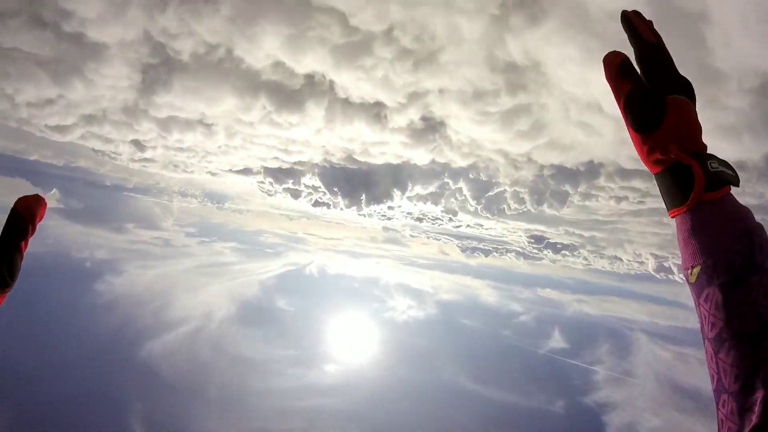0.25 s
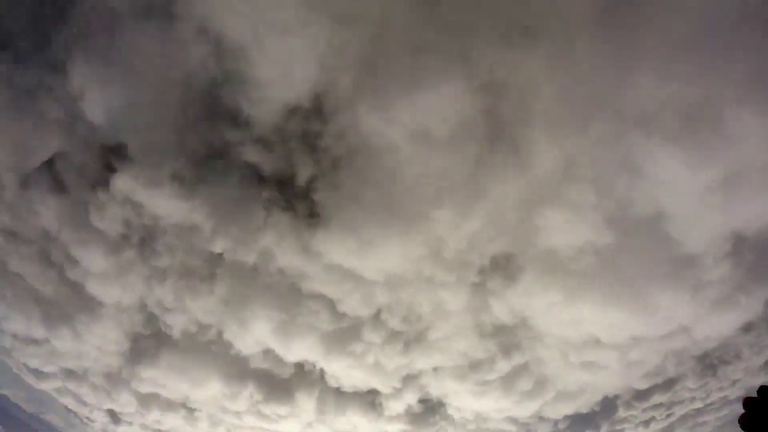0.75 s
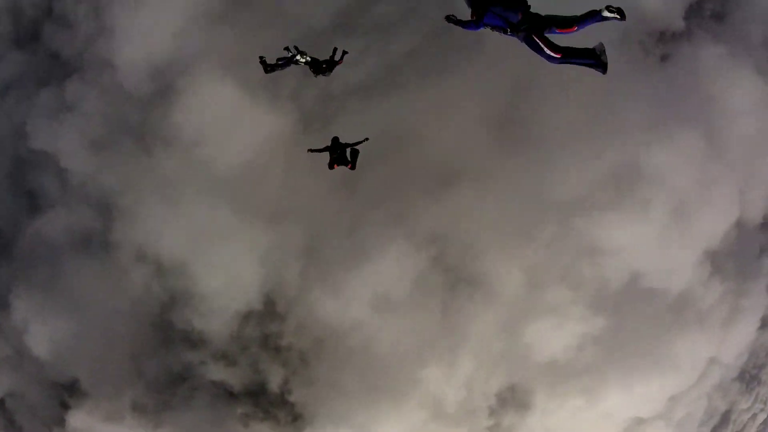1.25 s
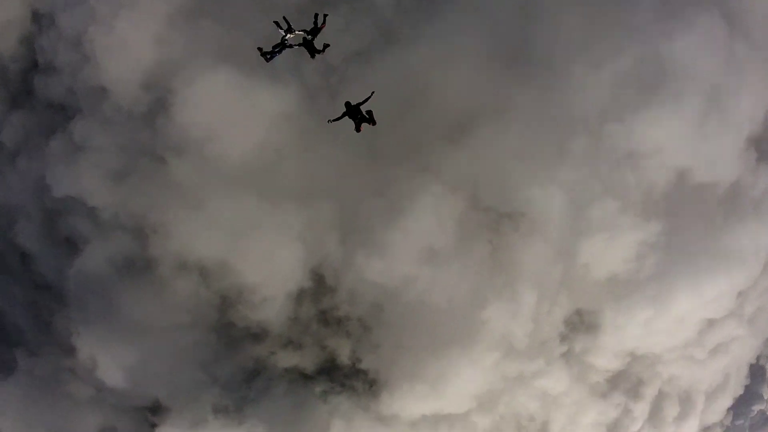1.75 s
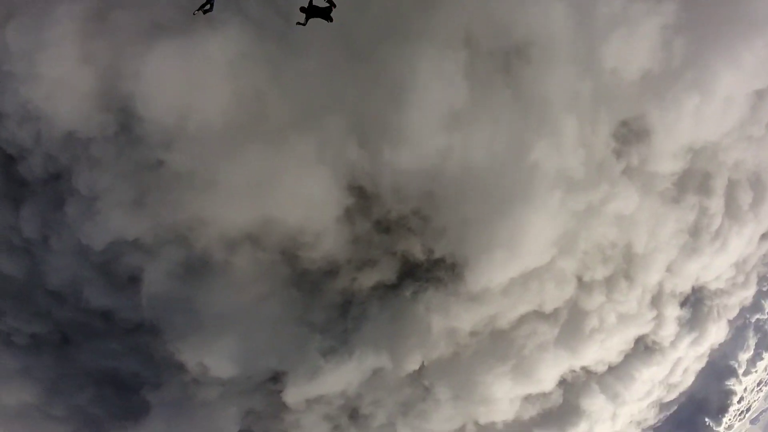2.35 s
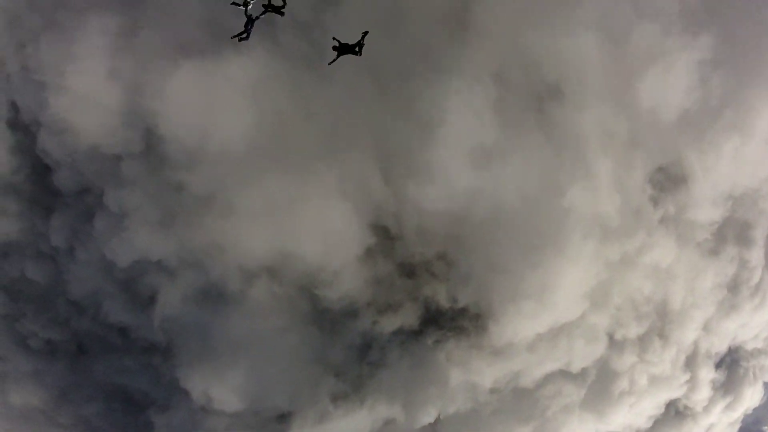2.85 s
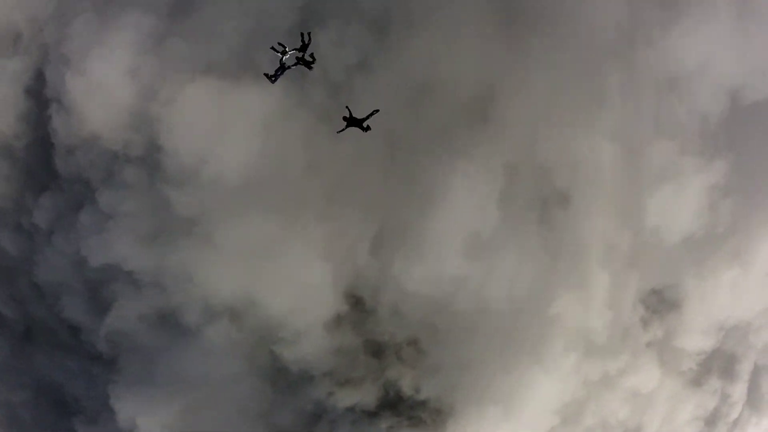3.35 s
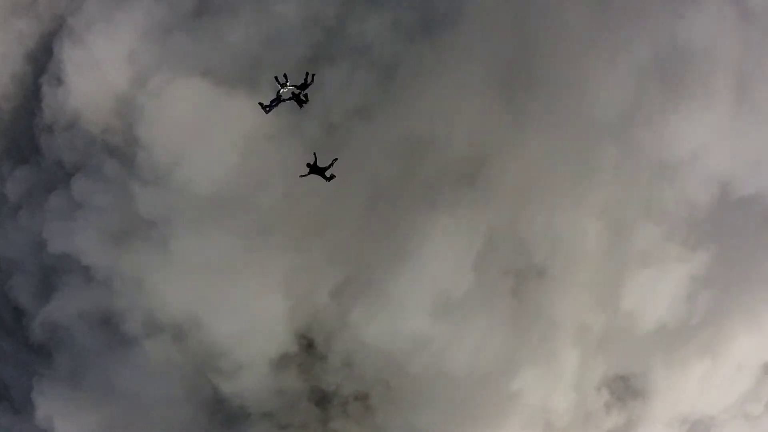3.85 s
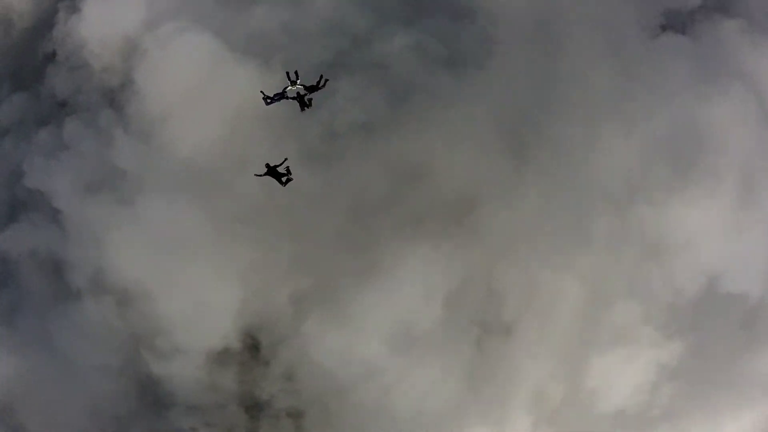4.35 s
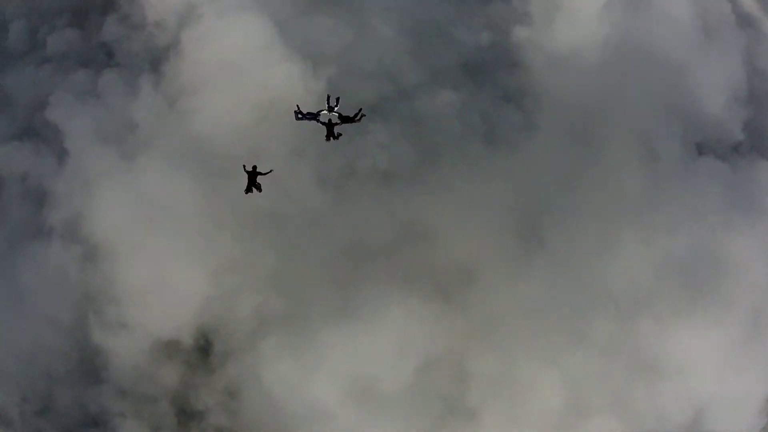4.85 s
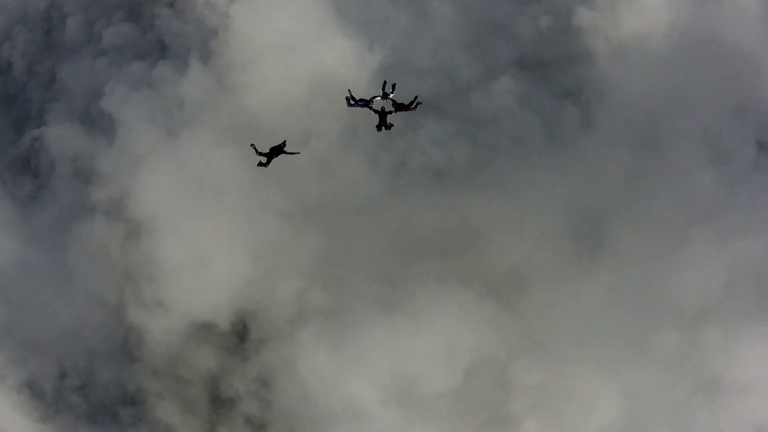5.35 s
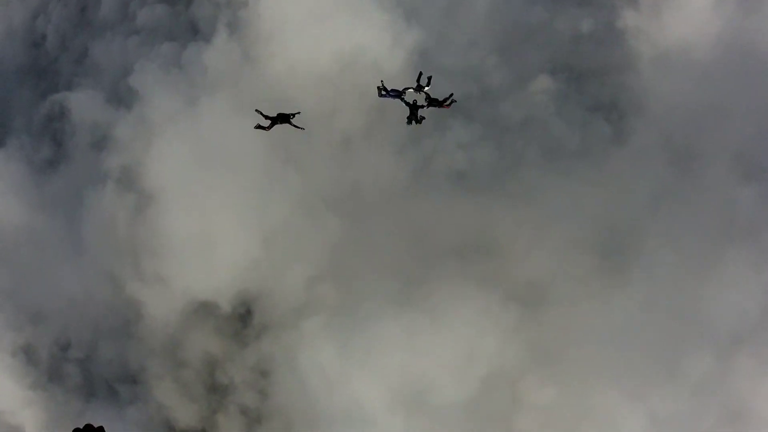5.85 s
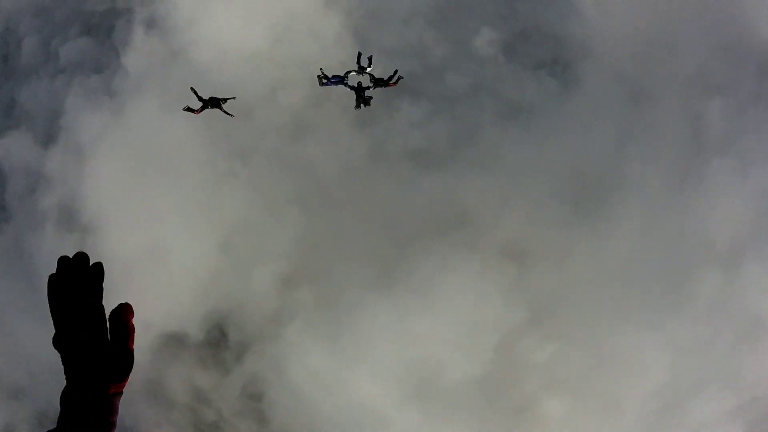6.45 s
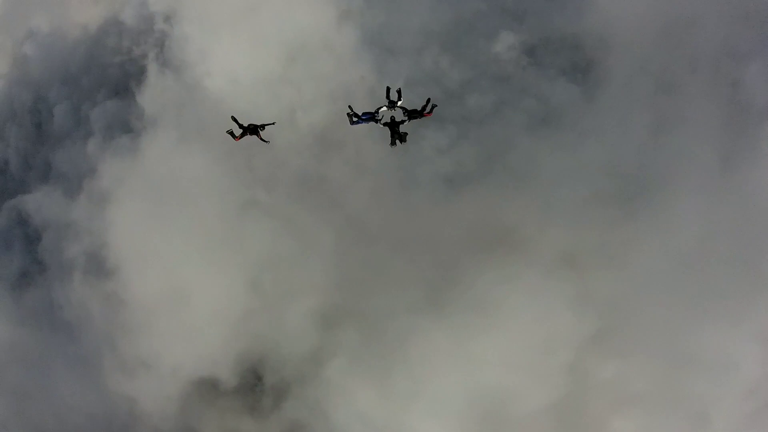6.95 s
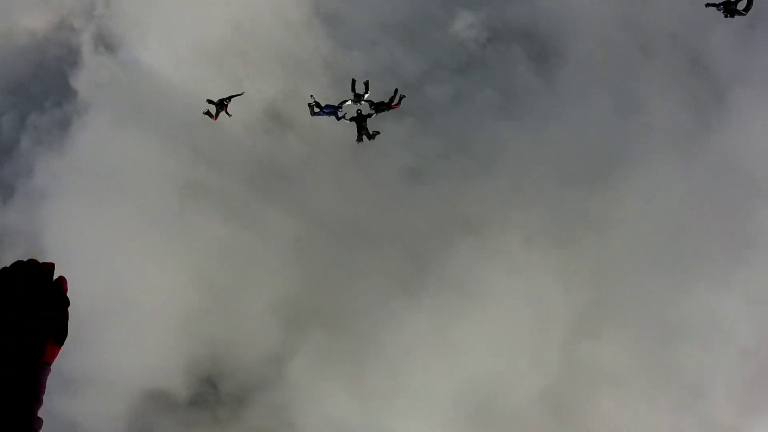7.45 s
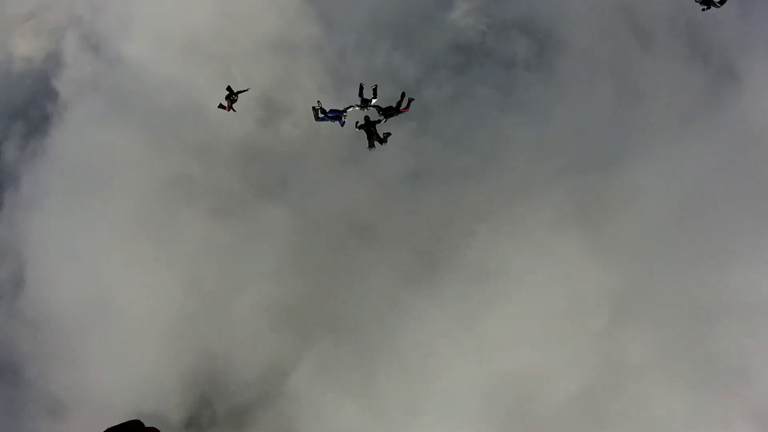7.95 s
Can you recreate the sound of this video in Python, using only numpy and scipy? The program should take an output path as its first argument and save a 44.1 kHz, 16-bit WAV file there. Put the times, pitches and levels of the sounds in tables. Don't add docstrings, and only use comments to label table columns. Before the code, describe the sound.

Rushing air buffets a skydiver's camera housing, deep rumble under hollow hiss, fluttering gusts and scattered sharp clacks of a buckle.

```python
import sys
import numpy as np
from scipy import signal
from scipy.fft import rfft, irfft, next_fast_len
from scipy.io import wavfile
from scipy.ndimage import uniform_filter1d

SR = 44100
rng = np.random.default_rng(int(sys.argv[2]) if len(sys.argv) > 2 else 0)


def to_wav(sig):
    pcm = np.clip(np.atleast_2d(sig), -1, 1) * 32767
    pcm = np.round(pcm).astype(np.int16)
    wavfile.write(sys.argv[1], SR, pcm.T)


def voltage_ratio(decibels):
    exponent = np.asarray(decibels, float) / 20
    return 10 ** exponent


N = 361619
HZ = np.fft.rfftfreq(next_fast_len(N), 1 / SR)
TIME = np.arange(N) / SR

# t/s, rumble level/dB, small eddies re rumble/dB
BUFFET = [(0, -28, -9.5), (0.4, -28, -4.6), (0.7, -23, -9.5), (1.0, -26, -3), (1.15, -18, -5.0),
          (1.6, -15, -14), (1.8, -18.5, -9.5), (2.0, -25.5, -3), (2.22, -19, -21), (2.45, -31.5, -3.5),
          (3.25, -25, -4.5), (3.7, -18.7, -7), (4.2, -18, 0.5), (4.8, -17, -6.0), (5.5, -21.5, -5),
          (6.55, -23.5, -1), (6.9, -20.5, -6.5), (8.2, -18.5, -9)]
# t/s, change/dB, half length/s
SURGES = [(0.222, -5, 0.02), (0.653, -4, 0.018), (0.812, 7, 0.013), (1.424, -7, 0.023), (1.569, 8, 0.009),
          (1.701, -7, 0.014), (1.769, 3, 0.02), (2.091, -2, 0.02), (2.971, 6.5, 0.03), (3.138, 4.9, 0.02),
          (3.229, -5.5, 0.03), (4.113, 3.2, 0.02), (4.413, -9, 0.02), (4.512, -12, 0.014),
          (4.73, 3.5, 0.049), (5.07, -3, 0.02), (5.211, 5.5, 0.018), (5.342, -2, 0.02), (5.42, 3, 0.022),
          (5.519, -2, 0.02), (5.814, 4, 0.033), (5.927, -7, 0.025), (6.073, 3, 0.027), (6.422, 5, 0.018),
          (6.535, -2, 0.045), (6.771, 4, 0.033), (6.952, 1, 0.018), (7.052, -4, 0.032), (8.077, 4.5, 0.016),
          (8.145, -6, 0.022)]
# f/Hz, level/dB
RUMBLE_COLOUR = [(12, -38), (20, -6.5), (108, 2.5), (132, 1.5), (180, -10), (230, -41), (400, -120)]
# f/Hz, level/dB
EDDY_COLOUR = [(110, -39), (180, -4), (242, -1), (274, -4), (399, -5), (553, -12.5), (947, -13.5),
               (1050, -22.5), (1360, -19), (2310, -120)]
# f/Hz, width/Hz, level/dB
SHOULDER = [(162.5, 78, 0)]
# t/s, small eddies/dB, shell/dB, half length/s
GUSTS = [(0.212, 0.5, -3, .06), (0.69, 1, .5, 0.033), (0.863, -6.5, -2.5, 0.044), (1.113, 5, 3.5, 0.027),
         (1.29, -6.5, 0, 0.028), (1.438, -2.5, 3.5, 0.047), (1.72, 1, -2, 0.021), (2.018, 0, 7, 0.065),
         (2.208, 5.5, 5.5, 0.036), (2.86, 1.5, .3, .03), (3.714, 3, 0, 0.027), (4.01, 1, 1.5, 0.055),
         (4.347, -3.5, 0, 0.033), (4.605, 1.5, 1.5, .03), (4.78, 1.5, 2.5, 0.033), (5.102, -2, -2.8, 0.071),
         (6.35, 0.5, 1.5, 0.064), (7.09, -2.5, -0.5, 0.076), (7.256, 5, 3, 0.037), (7.557, 0, -5.5, 0.02)]

# t/s, rush level/dB, shell flow re rush/dB, grazing flow re rush/dB
FLOW = [(0, -30.5, -3.8, -13), (0.22, -18.5, -2.5, -15), (0.6, -14.5, -7, -17.5), (0.93, -28, 3.5, -13.5),
        (1.2, -16.5, -6, -17.0), (1.36, -22.5, -9, -18), (1.75, -21.2, -7.5, -20.5), (2.15, -29, -6, -13),
        (3.13, -16, -9.5, -12.5), (3.3, -23, -6.5, -13.5), (3.75, -24, -1, -11.5), (4.1, -23, 5, -13.5),
        (4.7, -24.5, 0.1, -13.0), (5.45, -20, -1.1, -14), (6.1, -20.5, -2.6, -14.9), (6.6, -22, 2, -12),
        (6.95, -19, -5, -14.6), (8.2, -20, -6, -17)]
# t/s, flutter/dB
UNREST = [(0, 0.9), (1.2, 1), (1.32, 4.5), (1.8, 4), (1.95, 2), (2.3, 0.8), (3.2, 0.8), (4.5, 1.6),
          (6.8, 1.6), (7.1, 2.2), (7.8, 2.5), (8.2, 3.5)]
# t/s, peak level/dB
PUFFS = [(1.1792, -15), (1.3134, -24), (1.3688, -16), (1.4182, -22), (1.4641, -27), (1.485, -19),
         (1.5354, -25), (1.5788, -23), (1.6072, -19), (1.6432, -29), (1.6636, -19), (1.701, -18),
         (1.737, -17), (1.7854, -19), (4.5072, -23), (5.444, -16), (6.999, -30), (7.0758, -22),
         (7.1157, -23), (7.3063, -20), (7.3991, -28), (7.4654, -13), (7.5158, -20), (7.7288, -14),
         (7.7957, -12), (7.9274, -19), (8.0087, -18), (8.085, -15), (8.1748, -17)]
# t/s, change/dB, half length/s
LULLS = [(.79, 0.5, 0.087), (1.02, -1.5, .05), (1.345, -3, 0.018), (1.406, -1.5, 0.0092),
         (1.43, -7.5, 0.027), (1.555, -3.5, 0.009), (1.69, -5, 0.0075), (1.723, -4.5, .01),
         (1.986, -3, 0.047), (2.109, -2.5, 0.042), (2.22, -2, 0.072), (3.2, -1.5, 0.027), (4.44, -1, 0.022),
         (4.79, 1, 0.057), (4.94, -0.5, .025), (5.633, -1.5, 0.022), (6.231, -2.5, .01),
         (6.358, -2.5, 0.012), (6.58, -2, .01), (6.93, -2.5, .016), (7.048, -2, 0.009),
         (7.098, -3.5, 0.0095), (7.379, -1, 0.011), (7.451, -3, 0.012), (7.492, -3, 0.012),
         (7.7, -0.1, 0.066), (7.896, -3, 0.012), (7.991, -4.5, 0.014), (8.063, -3, 0.0067),
         (8.141, -4, 0.045)]
# t/s, posture (-1 head-down, 1 flat)
POSTURE = [
    (0, .6),
    (.9, -0.57),
    (1.8, -0.26),
    (2.3, -1),
    (4.2, -1.15),
    (4.8, -0.37),
    (5.15, 0.73),
    (6.6, 0.71),
    (8.2, 0.66),
]

# f/Hz, width/Hz, level/dB
SHELL = [(1445, 293, 0), (1310, 280, -5)]
# f/Hz, width/Hz, level/dB
SKIRT = [(1787, 470, 0), (2750, 560, -2)]
# f/Hz, width/Hz, level/dB
PORT = [(2168, 226, 1), (2390, 260, 2.5)]
# f/Hz, width/Hz, level/dB
GAP = [(2580, 460, 0)]
# f/Hz, width/Hz, level/dB
CAVITY = [(2915, 540, 1), (3490, 760, -2), (3993, 370, -1.5)]
# f/Hz, width/Hz, level/dB
HIGH_CAVITY = [(5960, 820, 1), (6580, 910, -5.5), (4900, 810, -14)]
# f/Hz, width/Hz, level/dB
AIR = [(8200, 760, 1), (7580, 880, -2), (9260, 1300, -7)]
# f/Hz, width/Hz, level/dB
TOP = [(10750, 2000, 0), (12340, 2000, -7.5), (14500, 1500, -11.5)]

# t/s, f/Hz, level/dB
WHISTLE = [
    (.2, 9700, -70),
    (.21, 9800, -49),
    (.235, 10450, -47),
    (.25, 10500, -70),
]
# t/s, peak level/dB, f/Hz, upper modes/dB
KNOCKS = [(1.8098, 2, 1460, -8), (1.924, -7, 1460, -10), (3.1388, -5, 1450, -7), (3.161, 5, 1500, 1),
          (4.0013, -8, 1430, -9), (4.2478, -4, 1320, -7), (4.363, -7, 1370, 5), (4.42, -2, 1480, -15),
          (4.8223, -5, 1390, 2), (5.6306, 2.5, 1330, -18), (5.808, -2.5, 1390, -4),
          (5.8574, 1.5, 1430, -14), (5.9334, -5, 1430, -6), (6.206, -5, 1430, 8), (6.628, -2, 1380, 3),
          (6.6835, 1, 1460, -7), (7.4135, -4, 1500, -12), (7.705, -5, 1420, -7)]
# t/s, peak level/dB, f/Hz, upper modes/dB
TICKS = [
    (1.5354, -6, 2120, -14),
    (3.549, -9, 1600, -9),
    (3.5493, -8, 2160, -6),
    (3.694, -8, 1630, -9),
    (3.6935, -3.5, 2100, -8),
    (3.7678, -8, 2390, -4),
    (3.8182, -5, 2160, 7),
    (5.9344, -8, 2140, -10),
    (7.7274, -16, 2350, -8),
]
# t/s, gain/dB, recovery/s
DUCKS = [
    (1.815, -13, 0.032),
    (3.153, -3.5, 0.038),
]

# (dB of shell flow, dB of grazing flow, unit of posture)
FINE_EDDY_LAW, SKIRT_LAW, UPPER_LAW = (0.31, 0.36, 3.1), (0.041, 0.3, 0.27), (-0.15, 0.46, 0.1)
HISS_LAW, TOP_LAW, GAP_LAW = (0.13, 0.92, -0.72), (-0.1, 0.36, -1.3), (0.55, 0.95, -1.6)
DEEP_LAW = (.02, .02, 2.6)
PORT_LAW = (.02, -.1, 0.35)
SHOULDER_LAW = (.02, .02, -3)
USUAL_SHELL_DB, USUAL_GRAZE_DB = -3, -12
FINE_PER_RUSH, DEEP_PER_RUMBLE, SKIRT_PER_UNREST = 0.61, -0.18, -1.3


def level(x, db):
    return x * voltage_ratio(db) / np.sqrt(np.mean(x ** 2))


def play(table):
    s, *columns = np.transpose(table)
    return [np.interp(TIME, s, c) for c in columns]


def shape(points):
    hz, db = np.transpose(points)
    return voltage_ratio(np.interp(np.log(HZ + 1), np.log(hz), db))


def walk(rate):
    k = int(SR / rate)
    held = np.repeat(rng.standard_normal(N // 20)[:N // k + 1], k)[:N]
    slewed = uniform_filter1d(uniform_filter1d(held, k), k)
    return level(slewed - uniform_filter1d(slewed, size=5 * k), 0)


def noise_spectrum(gain):
    return gain * rfft(rng.standard_normal(next_fast_len(N)))


def rung(modes, own_db, rate):
    out = 0
    for hz, width, db in modes:
        resonance = 1 / (1 + (2 * (HZ - hz) / width) ** 2)
        flicker = voltage_ratio(db + own_db * walk(rate))
        out = out + flicker * irfft(noise_spectrum(resonance))[:N]
    return level(out, 0)


def steady(x, span_s, firmness):
    k = int(span_s * SR)
    power = uniform_filter1d(uniform_filter1d(x ** 2, k), k)
    return x * (np.mean(power) / (power + 1e-12)) ** (firmness / 2)


def split(gain, hz, low_db, high_db):
    share = 1 / (1 + (HZ / hz) ** 4)
    whole = noise_spectrum(gain)
    low = steady(irfft(whole * share)[:N], span_s=0.13, firmness=0.56)
    high = steady(irfft(whole * (1 - share))[:N], span_s=0.075, firmness=0.57)
    return (voltage_ratio(low_db) * low + voltage_ratio(high_db) * high) / np.std(low + high)


def strikes(rows, rise_s):
    out = np.zeros(N)
    for s, size, fade_s in rows:
        t = np.maximum(TIME - s, 0)
        out += size * (1 - np.exp(-t / rise_s)) * np.exp(-t / fade_s)
    return out


def swells(rows):
    out = np.zeros(N)
    for s, db, half_s in rows:
        near = slice(max(int((s - 0.3) * SR), 0), int((s + 0.3) * SR))
        half_s = np.clip(half_s, 0.004, 0.08)
        out[near] += db * np.exp(-0.5 * ((TIME[near] - s) / half_s) ** 2)
    return out


def by_angle(law):
    per_shell, per_graze, per_posture = law
    _, shell_db, graze_db = play(FLOW)
    turned_db = per_shell * (shell_db - USUAL_SHELL_DB) + per_graze * (graze_db - USUAL_GRAZE_DB)
    return turned_db + per_posture * play(POSTURE)[0]


def buffet():
    rumble_db, small_db = play(BUFFET)
    surge_db = swells(SURGES)
    gust_db = swells([(s, db, half_s) for s, db, _, half_s in GUSTS])

    deep_db = DEEP_PER_RUMBLE * (rumble_db + 24) + by_angle(DEEP_LAW) + 0.4
    swing = split(shape(RUMBLE_COLOUR), 62, deep_db, 0)
    rumble = swing * voltage_ratio(0.2 + surge_db + 0.65 * walk(7.9))

    fine_db = by_angle(FINE_EDDY_LAW) + FINE_PER_RUSH * (play(FLOW)[0] + 20) + 0.27
    small_db = small_db + gust_db - 0.28 + 0.28 * surge_db + 0.86 * walk(14)
    small = split(shape(EDDY_COLOUR), 540, 0, fine_db) * voltage_ratio(small_db)

    shed_db = by_angle(SHOULDER_LAW) - 11 + gust_db + 0.54 * surge_db
    shed = voltage_ratio(shed_db) * rung(SHOULDER, own_db=2.5, rate=12)
    return voltage_ratio(rumble_db) * (rumble + small + shed), swing


def whistle():
    hz, db = play(WHISTLE)
    sounding = (TIME > WHISTLE[0][0]) & (TIME < WHISTLE[-1][0])
    cycles = np.cumsum(hz * (1 + 0.0056 * walk(150))) / SR
    return sounding * voltage_ratio(db) * np.sin(2 * np.pi * cycles)


def knocks():
    out = np.zeros(N + 2000)
    t = np.arange(800) / SR
    blow = t ** 3.1 * np.exp(-t / (0.0016 * 0.53))
    blow = blow / blow.max()
    upper_modes = np.sin(2 * np.pi * 2400 * t) + np.sin(2 * np.pi * 3000 * t)
    for s, db, hz, upper_db in KNOCKS + TICKS:
        ring = np.sin(2 * np.pi * hz * t)
        upper = upper_modes * voltage_ratio(upper_db - 11.5)
        crack = voltage_ratio(db - 9.5) * np.exp(-t / 0.00052) * np.sin(2 * np.pi * 1.2 * hz * t)
        i = int(s * SR)
        out[i:i + len(t)] += voltage_ratio(db - 6) * blow * (ring + upper)
        out[i + 30:i + 30 + len(t)] += crack
    return out[:N]


def rush(swing):
    rush_db, shell_db, high_db = play(FLOW)
    unrest_db = play(UNREST)[0]
    lull_db = swells(LULLS)
    rush_db = rush_db + 1.5 * lull_db - 0.4

    pumping = np.imag(signal.hilbert(swing, next_fast_len(N)))[:N]
    flutter = unrest_db * (0.29 * walk(55) + 0.41 * walk(130) + 0.6 * pumping)
    puffs = strikes([(s, voltage_ratio(db - 1), 0.0085) for s, db in PUFFS], rise_s=0.0011)
    flow = np.hypot(voltage_ratio(rush_db), puffs)

    skirt_db = by_angle(SKIRT_LAW) + SKIRT_PER_UNREST * (unrest_db - 1.2)
    shell_db = shell_db + swells([(s, db, half_s) for s, _, db, half_s in GUSTS])
    shell = steady(rung(SHELL, own_db=0, rate=21), span_s=0.056, firmness=0.54)
    shell = shell + voltage_ratio(skirt_db - 5.5) * rung(SKIRT, own_db=1, rate=30)
    shell_db = rush_db + shell_db + 1.62 + 0.5 * flutter + 1.03 * walk(45) + 0.99 * walk(140)
    shell = voltage_ratio(shell_db) * shell

    upper_db, gap_db = by_angle(UPPER_LAW), by_angle(GAP_LAW)
    port = steady(rung(PORT, own_db=0.4, rate=27), span_s=0.047, firmness=0.4)
    port = voltage_ratio(by_angle(PORT_LAW) - 3.5 - 0.27 * flutter) * port
    cavity = port + voltage_ratio(upper_db - 2.5) * rung(CAVITY, own_db=0.65, rate=30)
    cavity = voltage_ratio(0.5 + flutter - 0.32 * upper_db) * cavity
    gap = voltage_ratio(gap_db - 7.5 + flutter) * rung(GAP, own_db=0.3, rate=38)
    cavity = voltage_ratio(-0.15 * gap_db) * cavity + gap

    high_db = high_db + 0.5 * lull_db + 1.9 + 1.16 * flutter
    high = voltage_ratio(high_db) * rung(HIGH_CAVITY, own_db=0.7, rate=23)

    hiss_db = by_angle(HISS_LAW) - 21.5 + 0.47 * lull_db + 2.45 + 0.8 * flutter
    top = voltage_ratio(by_angle(TOP_LAW) - 7.5) * rung(TOP, own_db=0.6, rate=33)
    hiss = voltage_ratio(hiss_db) * (rung(AIR, own_db=0.5, rate=27) + top)
    return shell + flow * (cavity + high + hiss)


def scene():
    rumble, swing = buffet()
    return (rumble + whistle() + knocks() + rush(swing))[None]


def roll_off(x):
    return signal.sosfilt(signal.butter(12, 15290, fs=SR, output="sos"), x)


def record(dry):
    wet = dry * voltage_ratio(strikes(DUCKS, rise_s=0.0024))
    return roll_off(np.tanh(0.65 * wet) / 0.67)


dry = scene()
out = record(dry)
to_wav(out)
```